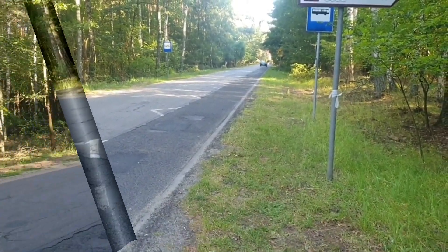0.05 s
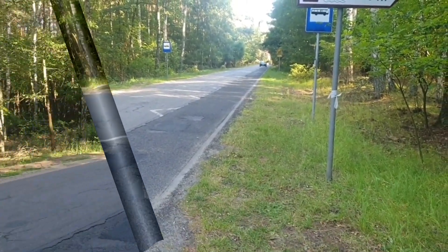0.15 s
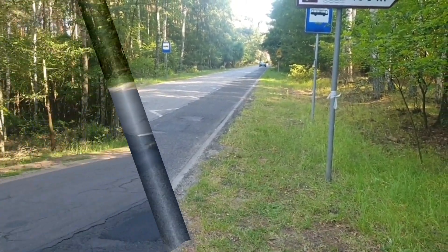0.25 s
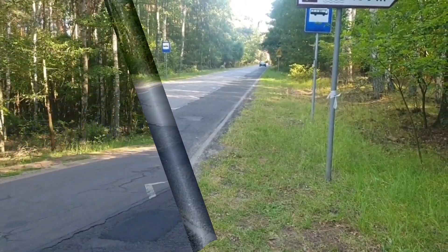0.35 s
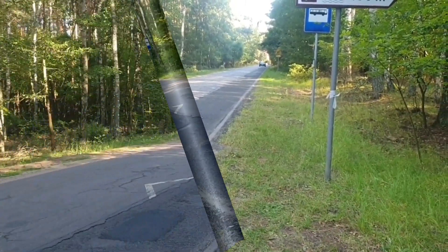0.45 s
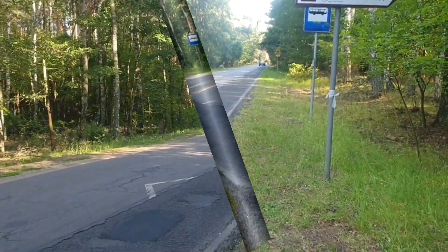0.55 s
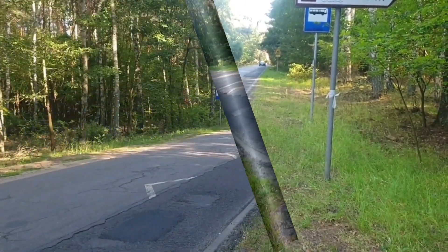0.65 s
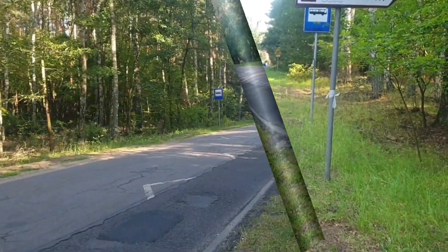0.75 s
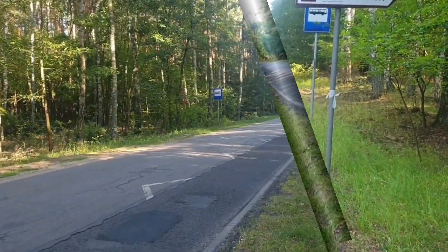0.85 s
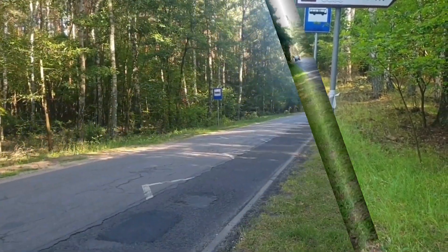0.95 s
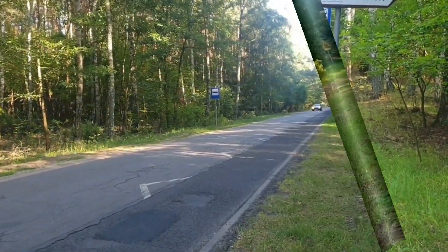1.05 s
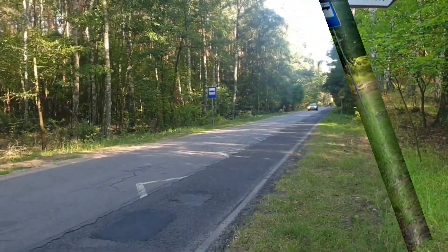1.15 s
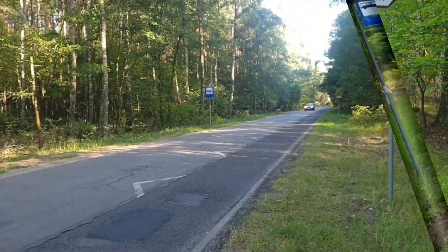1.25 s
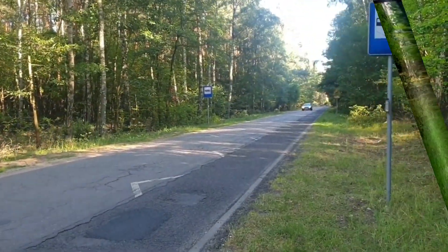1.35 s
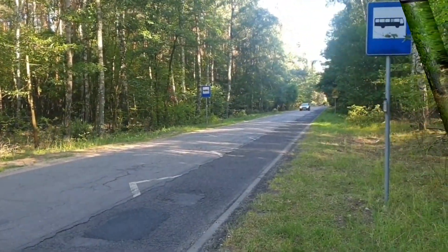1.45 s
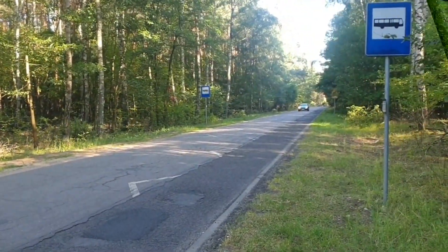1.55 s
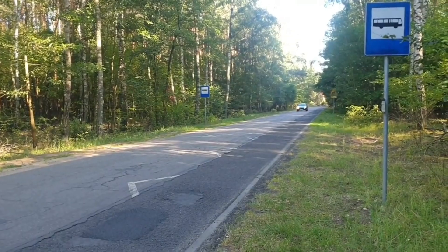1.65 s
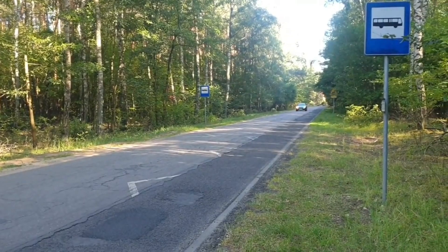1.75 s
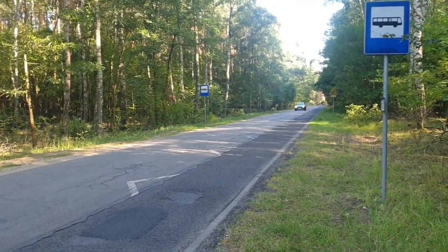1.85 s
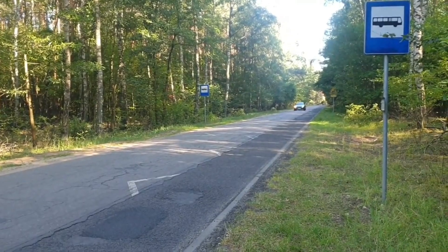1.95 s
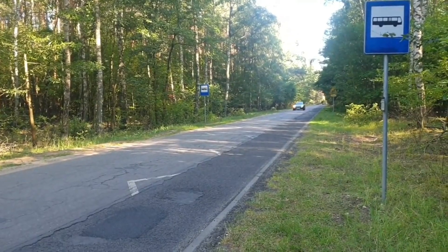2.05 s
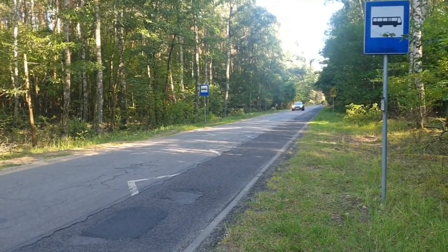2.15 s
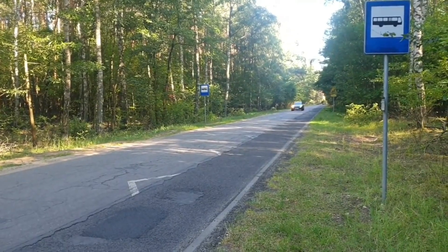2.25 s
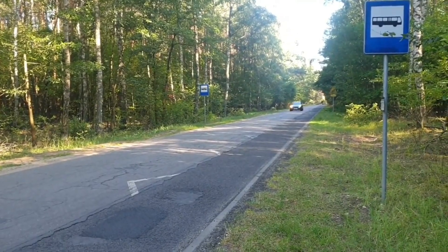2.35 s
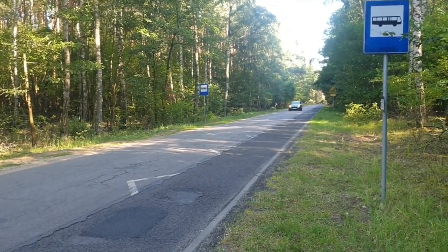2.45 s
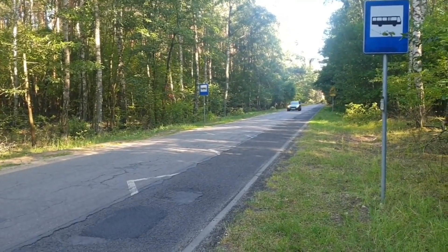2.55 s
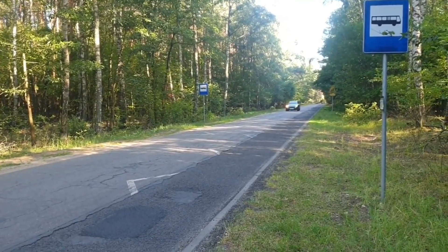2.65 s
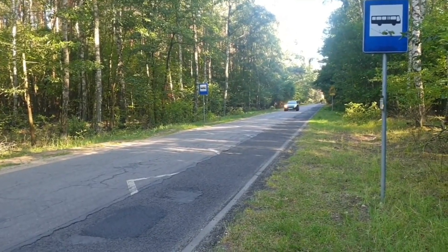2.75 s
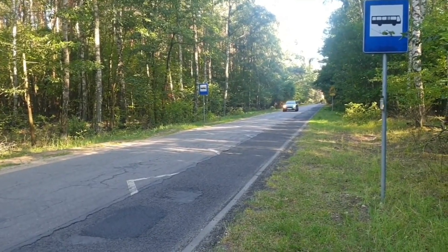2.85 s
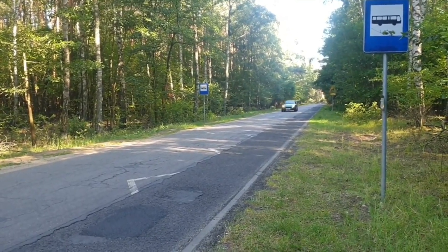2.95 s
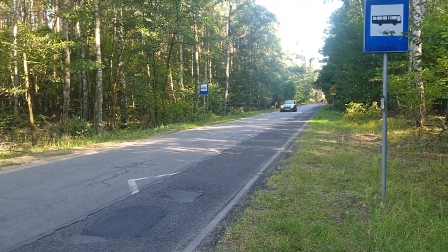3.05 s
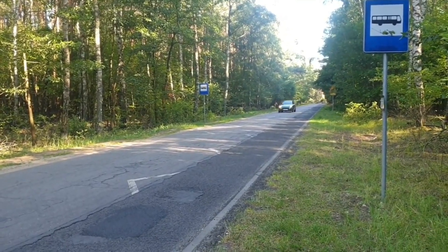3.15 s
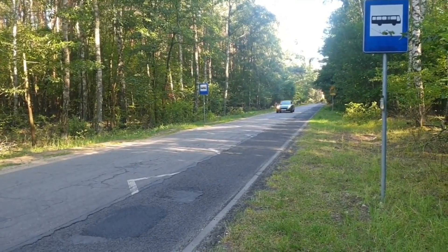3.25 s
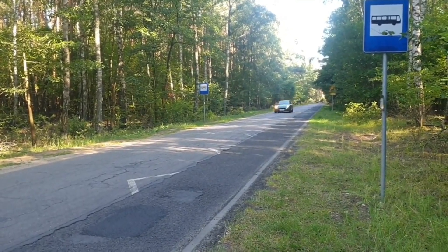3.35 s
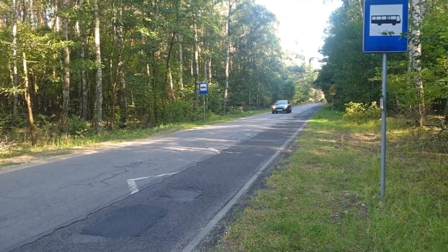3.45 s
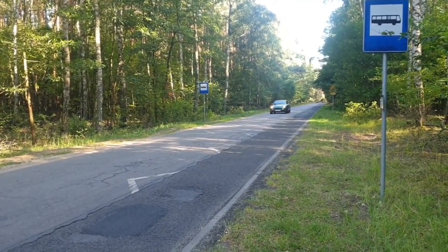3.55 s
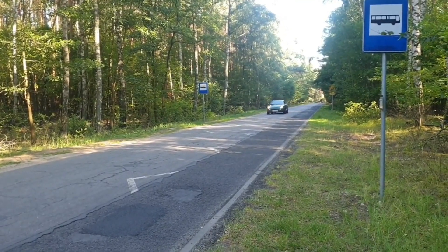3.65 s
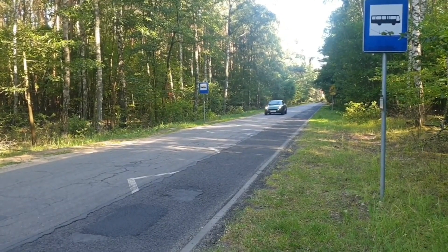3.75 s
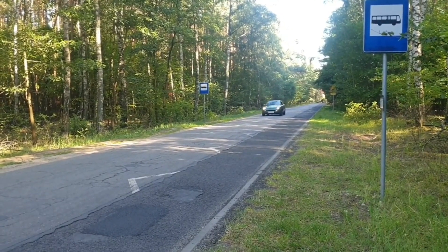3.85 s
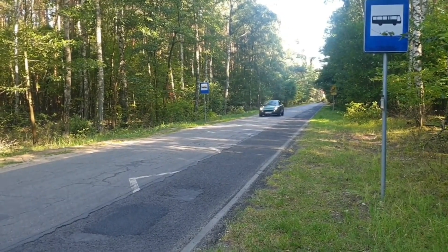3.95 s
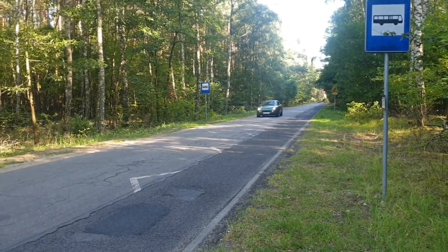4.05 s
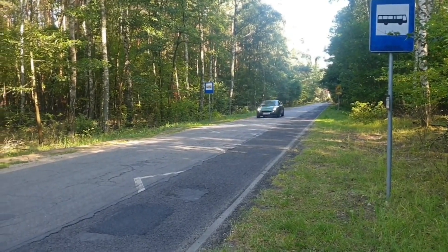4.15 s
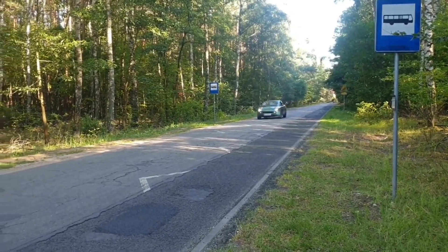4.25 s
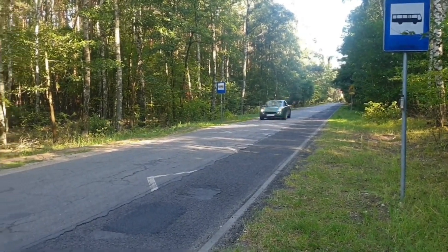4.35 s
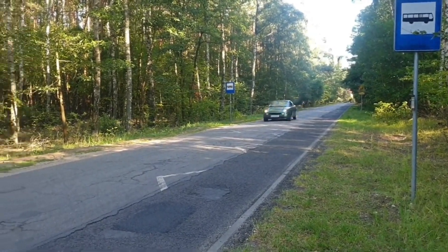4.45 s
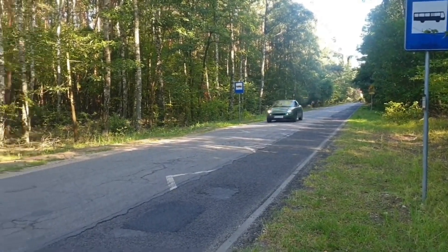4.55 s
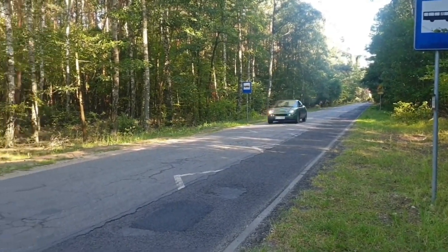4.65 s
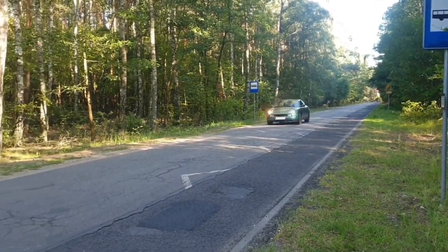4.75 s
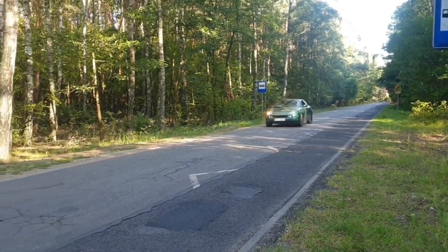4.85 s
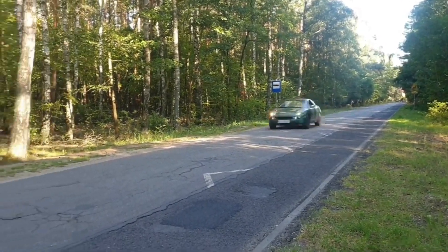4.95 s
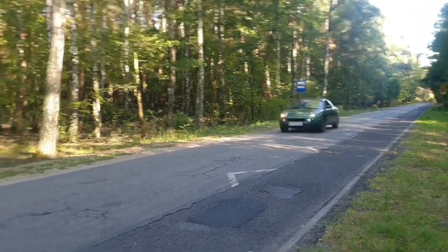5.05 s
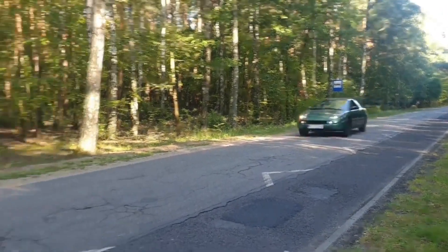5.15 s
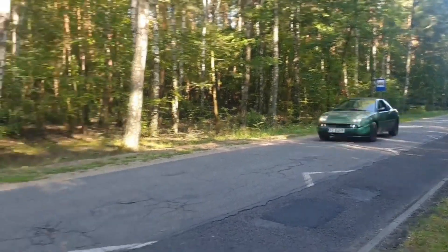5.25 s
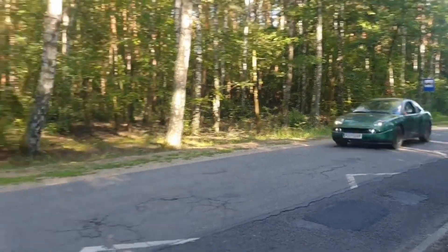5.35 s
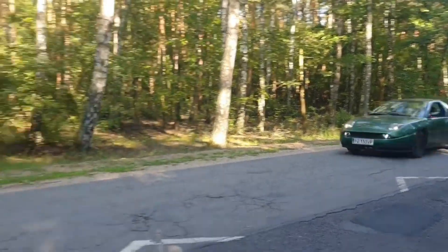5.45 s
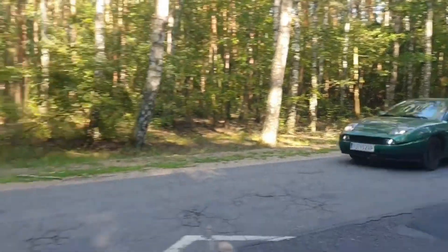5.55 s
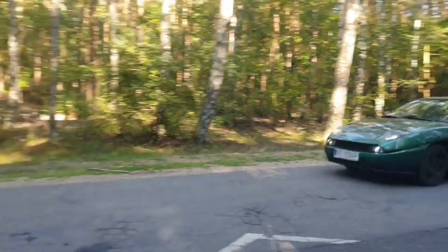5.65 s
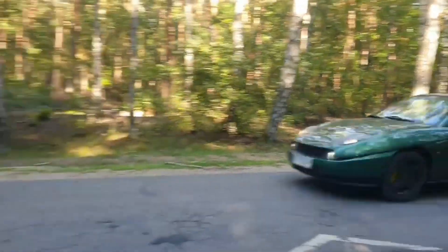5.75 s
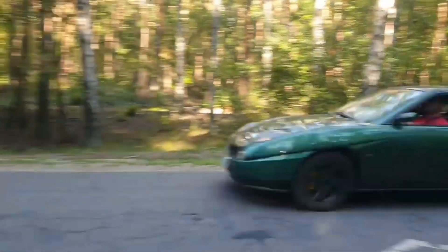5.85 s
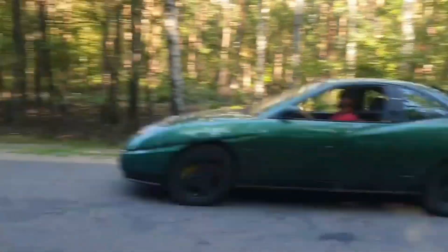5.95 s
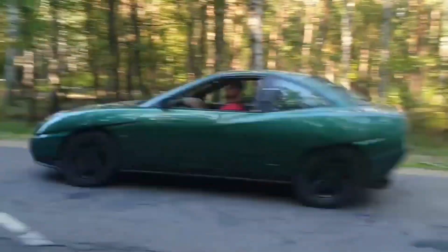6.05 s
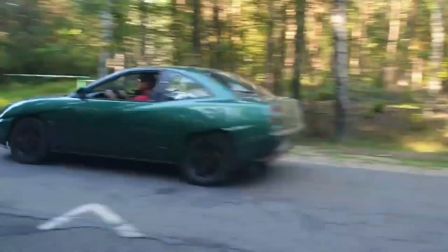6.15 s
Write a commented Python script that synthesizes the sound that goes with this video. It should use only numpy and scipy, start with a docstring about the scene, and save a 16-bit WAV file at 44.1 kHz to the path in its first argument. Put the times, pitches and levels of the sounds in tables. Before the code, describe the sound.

Outdoors at the roadside, one car's quiet drone dies away in under a second, followed by a clicky, broken cut. A second car hums faintly in the distance under low wind buffeting that jumps between left and right. Its tyre noise slowly builds, then the engine accelerates hard with a booming, throbbing exhaust. Loud rushing noise peaks as it reaches the microphone, slightly squashed by automatic gain, and the sound stops.

```python
"""A forest road. A car drones away as a cluster of wavering tones over dull tyre noise, and fades out.
The sound cuts, stutters, and fades in on a four-cylinder coupe far off; gusts of low noise thump at either port.
It cruises: engine tones locked to the firing cycle, over coloured noise for tyres, tread and exhaust gas.
Then the throttle opens: the exhaust growls, booms and climbs, and the layers swell as the distance shrinks.
A bright whoosh rises last, and gain control holds the loudness down just before the coupe draws level."""
import sys
import numpy as np
from scipy import signal
from scipy.fft import rfft, irfft
from scipy.io import wavfile
from scipy.ndimage import uniform_filter1d

SR = 44100
rng = np.random.default_rng(int(sys.argv[2]) if len(sys.argv) > 2 else 0)


def store_pcm(level_fs):
    """Save levels as 16-bit WAV."""
    pcm = np.round(np.clip(level_fs, -1, 1) * 32767).astype(np.int16)
    wavfile.write(sys.argv[1], SR, np.atleast_2d(pcm).T)


N = 273861

# all layer levels below are set ahead of the gain control
T = np.arange(N) / SR
BIN_HZ = np.fft.rfftfreq(1024, 1 / SR)[:, None]
FRAME_S = np.arange(N // 256 + 2) * 256 / SR
CUT_S = 0.7055  # from the departing car to the coupe


def amp(db):
    """Decibels to gain."""
    return 10 ** (np.asarray(db) / 20)


def evened(x):
    """Scales to an rms of 1."""
    return x / np.sqrt(np.mean(abs(x) ** 2) + 1e-20)


def curves(rows, t=T):
    """Each column of a table at the times t."""
    s, *columns = np.transpose(rows)
    return [np.interp(t, s, c) for c in columns]


def read(rows, column=1, hz=BIN_HZ):
    """One column of a table over the frequency bins, on a log frequency axis."""
    rows = np.array(rows)
    return np.interp(np.log(hz + 1), np.log(rows[:, 0]), rows[:, column])


def wander(rate_hz):
    """Smooth random drift of rms 1, with little movement faster than the rate."""
    points, points_per_s = 8192, 1000
    slow = np.fft.rfftfreq(points, 1 / points_per_s)
    spectrum = rfft(rng.standard_normal(points)) * np.exp(-(slow / rate_hz) ** 2)
    return evened(np.interp(T, np.arange(points) / points_per_s, irfft(spectrum)))


def frames(x):
    """Short-time spectra, bins by frames."""
    return signal.stft(x, nperseg=1024, noverlap=768)[2][..., :len(FRAME_S)]


def sound(z):
    """Short-time spectra back to samples."""
    return signal.istft(z, nperseg=1024, noverlap=768)[1][..., :N]


def steady_noise(colour):
    """Noise of one fixed colour and rms 1."""
    gain = amp(read(colour, hz=np.fft.rfftfreq(N, 1 / SR)))
    return evened(irfft(rfft(rng.standard_normal(N)) * gain, N))


# Lines of the departing car's drone. Each row: frequency in Hz, level in dB relative to the strongest.
DRONE = [(63, -19), (95.5, -4), (127.3, 0), (254.6, -13.5), (318, -21), (413.5, -27)]
# Colour of its tyres. Each row: frequency in Hz, relative level in dB per Hz.
LEAVING_TYRES = [(30, -20), (140, 1), (270, -4), (400, -11.5), (590, -20.5), (670, -19.5), (900, -7),
                 (1350, -5), (1620, -16), (2100, -13), (2600, -25.5), (4700, -32), (7000, -52),
                 (16000, -60)]


def leaving_car(drone_db=-45.3, tyres_db=-50, left_db=2.5, scatter=.45, waver=0.3, fade_power=0.88,
                dulling_db_per_hz=0.0013, silence_s=0.013, flutter_db=1.0):
    """A far, wavering drone and a tyre wash leaning left that dulls; both fade out just before the cut."""
    fade = np.maximum(1 - T / (CUT_S - silence_s), 0) ** fade_power
    drone = 0
    for hz, db in DRONE:
        drone = drone + amp(db) * np.sin(2 * np.pi * (hz * T + rng.random()) + waver * wander(11))
    shared, left, right = (steady_noise(LEAVING_TYRES) for _ in range(3))
    tyres = shared + scatter * np.array([left, right])
    tyres = evened(tyres * amp([[left_db], [-left_db]]))
    dulling = amp(-dulling_db_per_hz * BIN_HZ * np.minimum(FRAME_S / CUT_S, 1))
    tyres = sound(frames(tyres) * dulling)
    return fade * (amp(drone_db) * evened(drone) + amp(tyres_db + flutter_db * wander(25)) * tyres)


# The two ticks at the cut. Each row: start in seconds, peak level in dB.
TICKS = [(0.7058, -30.5), (0.721, -35)]
FADE_IN_S = 0.013  # return of the sound after the second tick


def stutter(x, muffled_hz=2600, tick_s=0.0005):
    """The sound snaps on muffled, snaps off again, and fades back in clear."""
    (on_s, _), (off_s, _) = TICKS
    muffled = signal.sosfilt(signal.butter(4, muffled_hz, fs=SR, output="sos"), x)
    back = np.clip((T - off_s) / FADE_IN_S, 0, 1) ** 2
    ticks = sum(amp(db) * (T >= s) * np.exp(-abs(T - s) / tick_s) for s, db in TICKS)
    return np.where(T < off_s, muffled * (T >= on_s), x * back) + ticks


# Colour of wind on the ports. Each row: frequency in Hz, relative level in dB per Hz.
WIND = [(15, -34), (30, -32), (50, 5.5), (70, 0.5), (100, 0.5), (170, -12), (300, -20.5), (600, -83)]


def buffet():
    """Turbulence of nearly even strength, for a gust to shape."""
    swirl = signal.hilbert(steady_noise(WIND))
    return evened(swirl.real / np.sqrt(abs(swirl) ** 2 + .1))


# Strong gusts on single ports. Each row: peak time in seconds, half-width to 1/e in seconds,
# peak level in dB, port (0 left, 1 right).
GUSTS = [(0.735, 0.018, -27, 1), (0.815, 0.035, -26, 1), (0.89, 0.025, -32, 1), (1.08, 0.025, -36, 1),
         (1.145, 0.045, -28, 0), (1.185, 0.025, -36, 1), (1.585, 0.035, -31, 0), (1.73, 0.025, -38, 1),
         (1.83, 0.025, -37, 1), (2.18, 0.025, -32, 0), (2.68, 0.045, -26.5, 0), (2.9, 0.04, -31.5, 0),
         (3.39, 0.025, -30, 0), (4.36, 0.04, -35, 1), (4.62, 0.025, -32, 0), (4.78, 0.025, -33, 0)]
# The breeze between them, before its lumps. Each row: time in seconds, left level in dB, right level in dB.
BREEZE = [(0.9, -49, -42), (2.05, -50, -45), (2.25, -35.5, -45), (4.6, -41.5, -48), (5.5, -51, -50),
          (6.1, -45, -45)]


def wind(lumpy_db=3.0, lumps_hz=7.0):
    """Low turbulence, unrelated between the ports: a lumpy breeze and short, thumping gusts."""
    breeze = np.array([amp(db + lumpy_db * wander(lumps_hz)) * steady_noise(WIND) for db in curves(BREEZE)])
    gusts = np.zeros((2, N))
    for peak, width, db, port in GUSTS:
        gusts[int(port)] += amp(db) * np.exp(-((T - peak) / width) ** 2)
    return breeze + gusts * np.array([buffet(), buffet()])


# Colour of the hiss, and of the tread fizz too. Each row: frequency in Hz, relative level in dB per Hz.
FIZZ = [(3000, -6), (6000, 2), (7500, -4), (9000, -5), (10800, 2), (13000, -1), (15000, -2)]
RUSTLE_S = 2.79


def high_hiss(hiss_db=-80, rustle_length_s=0.035, rustle_db=-68):
    """A very faint steady hiss, with one brief rustle."""
    level = amp(hiss_db) + amp(rustle_db) * np.exp(-((T - RUSTLE_S) / rustle_length_s) ** 2)
    return level * np.array([steady_noise(FIZZ), steady_noise(FIZZ)])


# the coupe's lane lies this far from the microphone; it would draw level just after the sound ends
LANE_M, ROAD_M_PER_S, ABREAST_S = 6.13, 17.22, 6.353


def distance(t=T):
    """Metres from the microphone to the coupe."""
    return np.hypot(LANE_M, ROAD_M_PER_S * (ABREAST_S - t))


def abreast(t):
    """Sine of the coupe's bearing: near 0 far up the road, 1 when it is level."""
    return LANE_M / distance(t)


# The driver's foot. Each row: time in seconds, throttle from 0 to 1.
THROTTLE = [(4.62, 0), (4.88, 0.7), (5.4, 1)]


def heard_db(layer):
    """A layer grows as the car nears and, after its own lag, as the throttle opens."""
    abreast_db, doubling_db, throttle_db, lag_s = layer
    doublings = np.log2(distance() / LANE_M)
    return abreast_db - doubling_db * doublings + throttle_db * curves(THROTTLE, T - lag_s)[0]


# The microphone ports. Each row: frequency in Hz, likeness from 0 to 1, radians by which the left leads
# (before scaling by far_lead), left level over right in dB.
PORTS = [(60, 1, -0.36, 2), (207, 0.95, -0.015, 0.4), (380, 0.86, -0.35, 4), (615, 1, -0.47, 0),
         (950, 0.68, -0.5, 1.5), (1440, 0.59, -0.81, -2.5), (2170, 0.82, -0.55, -5.5),
         (2960, 0.46, -0.71, 0.5), (3850, 0.55, -1.25, -6.5), (5000, 0.42, -0.82, 1),
         (8200, 0.33, -0.96, 11), (10000, 0.18, -0.92, -0.5)]
PORT_DELAY_S = 0.00031  # extra time to the left port when the car is abreast


def at_ports(direct, diffuse, far_lead=0.85):
    """Road sound reaches the right port first, more so as the car nears; tree scatter makes noise unlike."""
    same = np.clip(read(PORTS), 0, 1)
    near_lag = 2 * np.pi * BIN_HZ * PORT_DELAY_S * abreast(FRAME_S) ** 2
    lead = read(PORTS, column=2) * far_lead - near_lag
    balance = amp(read(PORTS, column=-1) / 2)
    right = direct if diffuse is None else same * direct + np.sqrt(1 - same ** 2) * diffuse
    return np.array([direct * balance, right * np.exp(-1j * lead) / balance])


def noise(colour_db):
    """Noise from the road, of steady rms 1, whose colour may move."""
    gain = amp(colour_db)
    gain = gain / np.sqrt((gain ** 2).sum(0))
    return evened(sound(at_ports(*frames(rng.standard_normal((2, N)))) * gain))


def fading(depth_db, rate_hz=9.0, clear_at=0.25):
    """Echoes from the forest make a tone swell and sink, most while the car is far (dB)."""
    return depth_db * wander(rate_hz) * np.exp(-abreast(T) / clear_at)


# Engine speed, four firings to a cycle. Each row: time in seconds, cycles per second before a slight waver.
SPEED = [(0.7, 30.6), (2, 31.35), (4.65, 32.2), (5, 33.2), (5.3, 34.4), (5.6, 36.45), (6.0, 39.35),
         (6.2, 40.1)]


def engine_turns(waver=0.002037, waver_hz=14.1):
    """Engine cycles counted up from a slightly unsteady speed."""
    return np.cumsum(curves(SPEED)[0] * (1 + waver * wander(waver_hz))) / SR


# Boom and octave layers. Each holds: level in dB when abreast, dB lost per doubling of distance,
# dB added by full throttle, lag behind the throttle in seconds.
FIRING_TONE = (-11.5, 7, 13, 0.15)
OCTAVE_TONE = (-20.5, 6, 13.5, 0.11)
# The tones swell and sink as the car closes in. Each row: time in seconds, boom change in dB, octave change in dB.
SWELLS = [(4.55, 0, 0), (4.78, -2.5, 4.5), (4.98, 0, -1), (5.12, 1.5, -2), (5.28, 2, -1), (5.5, 0, 2.5),
          (5.72, -1, 0.5), (5.85, 2.5, 0), (5.98, -1.5, 2), (6.06, -3, -6), (6.15, -0.5, 1)]
# The throb deepens as the car draws near. Each row: time in seconds, added level in dB.
THROB = [(5.6, 0), (5.95, 4)]
# Weaker engine lines. Each row: multiple of the cycle rate, then dB against the throb level when cruising
# and dB against it at full throttle.
ORDERS = [(2, -13, -26), (3, -12, -20), (5, -13, -16), (6, -24, -26), (7, -12.5, -16), (9, -16, -20.5),
          (10, -45, -26.5), (11, -28, -29), (12, -25, -28.5), (13, -25, -37), (17, -22, -32),
          (20, -14, -34), (24, -10, -31), (34, -14, -36), (40, -22.5, -28), (51, -10, -44)]


def exhaust(turns, orders_db=-1, blur_cruising=0.72, blur_loaded=0.5, firing_fade_db=4.3,
            octave_fade_db=1.2, line_fade_db=3.0, dulling_db_per_m=0.002):
    """Even firing gives boom and octave; one stronger cylinder adds other cycle multiples, heard as a throb."""
    firing_db, octave_db = heard_db(FIRING_TONE), heard_db(OCTAVE_TONE)
    firing_swell, octave_swell = curves(SWELLS)
    boom = amp(firing_db + firing_swell + fading(firing_fade_db))
    octave = amp(octave_db + octave_swell + fading(octave_fade_db))
    throttle, = curves(THROTTLE)
    firing = 2 * np.pi * 4 * turns
    # the two dip together: one sharp trough of pressure for each firing
    out = -(boom * np.cos(firing) + octave * np.cos(2 * firing))
    out = out * (1 + .05 * wander(30))
    throb_db = orders_db + (firing_db + octave_db) / 2 + curves(THROB)[0]
    # no two cycles are alike, but under load they even out
    blur = np.clip(blur_cruising + throttle * (blur_loaded - blur_cruising), 0, 1)
    for order, cruise_db, full_db in ORDERS:
        level = amp(throb_db + cruise_db + throttle * (full_db - cruise_db))
        # far off, each line comes and goes, and the higher ones lose more on the way
        level = level * amp(fading(line_fade_db, rate_hz=5.0) - dulling_db_per_m * order * distance())
        blur_hz = 2 + 0.3 * order
        scrambled = (wander(blur_hz) + 1j * wander(blur_hz)) / np.sqrt(2)
        sway = np.sqrt(1 - blur ** 2) + blur * scrambled
        out = out - level * (sway * np.exp(2j * np.pi * order * (turns - .5))).real
    return sound(at_ports(frames(np.sqrt(2) * out), None))


# Hollows that climb with engine speed. Each row: multiple of the cycle rate, width to 1/e in multiples, depth in dB.
HOLLOWS = [(13.3, 1.8, 4), (29.7, 1.7, 9), (48.5, 2.2, 6.5), (68, 3, 3)]


def hollows():
    """Dips in the noise that ride on the engine's cycle rate (dB)."""
    order = BIN_HZ / curves(SPEED, FRAME_S)[0]
    return -sum(depth * np.exp(-((order - at) / width) ** 2) for at, width, depth in HOLLOWS)


def patches(depth_db=1.94):
    """Echoes from the trunks add and cancel in narrow, slowly drifting bands (dB)."""
    field = rng.standard_normal((len(BIN_HZ), len(FRAME_S)))
    narrow = uniform_filter1d(field, size=3, axis=0)
    return depth_db * evened(uniform_filter1d(narrow, size=40, axis=1))


# the bounce: delay when abreast, share of it lost far away, depth of the ripple when abreast
ECHO_S, ECHO_SHRINK, ECHO_RIPPLE_DB = 0.00133, 0.07, 2.8


def road_echo():
    """The bounce off the asphalt combs the noise, deeper and a little lower as the car nears (dB)."""
    near = abreast(FRAME_S)
    delay = ECHO_S * (1 - ECHO_SHRINK * (1 - near))
    return ECHO_RIPPLE_DB * near ** 2 * np.cos(2 * np.pi * BIN_HZ * delay)


# Tyre roar. Each row: time in seconds, level in dB.
ROAR = [(0.75, -43), (2.0, -40), (2.7, -37.5), (3.6, -34.5), (4.8, -31.5), (5.5, -25.5), (6.1, -18.5)]
# Its colour from afar and close by. Each row: frequency in Hz, relative level in dB per Hz.
RUSH_FAR = [(400, -17), (750, -3), (1100, 1), (1400, -1), (2000, -1.5), (2600, -7.5), (3300, -15),
            (4000, -11.5), (4700, -22), (6500, -33.5), (8500, -43.5), (10000, -42), (12000, -57)]
RUSH_NEAR = [(400, -18), (750, -8), (1000, -3), (1500, -4), (1900, -9), (2300, -2.5), (2850, -6),
             (3300, -15), (3800, -2), (4700, 1.5), (6500, -7), (9000, -30)]


def tyre_roar(near_colour=0.48):
    """Broad tyre noise leans toward its close-by colour as the car nears, rippled by hollows and echoes."""
    close = near_colour * abreast(FRAME_S)
    colour = (1 - close) * read(RUSH_FAR) + close * read(RUSH_NEAR)
    return noise(colour + hollows() + patches() + road_echo()) * amp(curves(ROAR)[0])


# Exhaust gas layer: level in dB when abreast, dB lost per doubling of distance, dB added by full throttle,
# lag behind the throttle in seconds.
EXHAUST_RASP = (-13.3, 9.3, 0.45, 0.3)
# Its colour. Each row: frequency in Hz, relative level in dB per Hz.
RASP = [(60, -0.5), (140, 11), (260, 8), (350, 2), (490, 1.5), (640, 3), (780, 2.5), (1000, 2.5),
        (1600, -39)]


def exhaust_rasp(turns, pulsing=0.55):
    """Rough gas noise that puffs hardest once in each engine cycle."""
    puffs = np.cos(np.pi * turns) ** 4
    return noise(read(RASP) + hollows()) * evened(np.exp(pulsing * puffs)) * amp(heard_db(EXHAUST_RASP))


# Tread layer: level in dB when abreast, dB lost per doubling of distance (before the air's own loss),
# dB added by full throttle, lag behind the throttle in seconds.
TREAD_FIZZ = (-24.3, 5.5, 0.1, 2.5)
AIR_DB_PER_M = 0.87


def tread_fizz():
    """Treble from the tread, soaked up by the air on its way."""
    soaked_db = AIR_DB_PER_M * (distance() - LANE_M)
    return noise(read(FIZZ)) * amp(heard_db(TREAD_FIZZ) - soaked_db)


# Whoosh as the car's side opens to the microphone. Each row: time in seconds, level in dB before the grit.
WHOOSH_LEVEL = [(4.8, -58), (5.6, -43), (5.9, -28), (5.99, -20), (6.09, -18.5), (6.2, -18)]
# Its colour. Each row: frequency in Hz, relative level in dB per Hz.
WHOOSH = [(300, -14), (900, -4), (1500, 1), (2300, 2.5), (3200, -1.5), (4000, -8.5), (5000, -21),
          (9000, -38)]


def side_whoosh(grit_db=2.0, grit_hz=160):
    """A bright noise band whose level trembles fast enough to sound gritty."""
    return noise(read(WHOOSH) + road_echo()) * amp(curves(WHOOSH_LEVEL)[0] + grit_db * wander(grit_hz))


def rush(turns, flicker_db=0.68):
    """The coupe's noise layers together, their level flickering as one."""
    layers = tyre_roar() + exhaust_rasp(turns) + tread_fizz() + side_whoosh()
    return layers * amp(flicker_db * wander(44))


# The growl as the engine takes up the load. Each row: time in seconds, level in dB.
GROWL_LEVEL = [(4.0, -60), (4.2, -43), (4.72, -44), (4.9, -36), (5.3, -31), (5.5, -30.5), (5.9, -31)]
# Colour of its gas. Each row: frequency in Hz, relative level in dB per Hz.
GROWL = [(400, -35), (520, -10), (600, 0), (720, 0), (860, -4), (1050, -14), (1300, -6), (1700, -16),
         (2500, -45)]
# Ringing of the pipe. Each row: time in seconds, pitch in Hz before jitter.
PIPE = [(5.3, 650), (5.8, 730)]
# puff half-width to 1/e in cycles, drift of its strength in dB rms, share of the power that rings
BARK_CYCLES, BARK_UNEVEN_DB, RING_SHARE = 0.19, 1.0, 0.65


def growl(turns, jitter=0.7):
    """Under load one cylinder barks loudest: in every cycle a coarse puff briefly rings the pipe."""
    phase = turns % 1 - .5
    puffs = np.exp(-(phase / BARK_CYCLES) ** 2) * amp(BARK_UNEVEN_DB * wander(20))
    since_bark_s = phase / curves(SPEED)[0]
    ring = np.cos(2 * np.pi * curves(PIPE)[0] * since_bark_s + jitter * wander(35))
    rung = evened(sound(at_ports(frames(ring * puffs), None)))
    gas = noise(read(GROWL)) * evened(np.sqrt(puffs))
    return (np.sqrt(RING_SHARE) * rung + np.sqrt(1 - RING_SHARE) * gas) * amp(curves(GROWL_LEVEL)[0])


def scene():
    """The departing car, then a hard, stuttering cut to the approaching one."""
    turns = engine_turns()
    coupe = wind() + high_hiss() + exhaust(turns) + rush(turns) + growl(turns)
    return np.where(T < CUT_S, leaving_car(), stutter(coupe))


def gain_control(x, threshold_db=-20, ratio=2.28, response_s=0.045):
    """Turns both ports down together once their smoothed power passes the threshold."""
    keep = np.exp(-1 / (response_s * SR))
    power = signal.lfilter([1 - keep], [1, -keep], (x ** 2).mean(0))
    over_db = np.maximum(10 * np.log10(power + 1e-12) - threshold_db, 0)
    return x * amp(-over_db * (1 - 1 / ratio))


EDGE_HZ = 15200  # top of the band


def record(dry, low_cut_hz=30):
    """The microphone's low cut, the gain control and the band limit."""
    low_cut = signal.butter(3, low_cut_hz, "highpass", fs=SR, output="sos")
    thinned = signal.sosfilt(low_cut, dry)
    band_limit = signal.firwin(511, EDGE_HZ, window=("kaiser", 9), fs=SR)
    return signal.oaconvolve(gain_control(thinned), band_limit[None], "same")


dry = scene()
out = record(dry)
store_pcm(out)
```